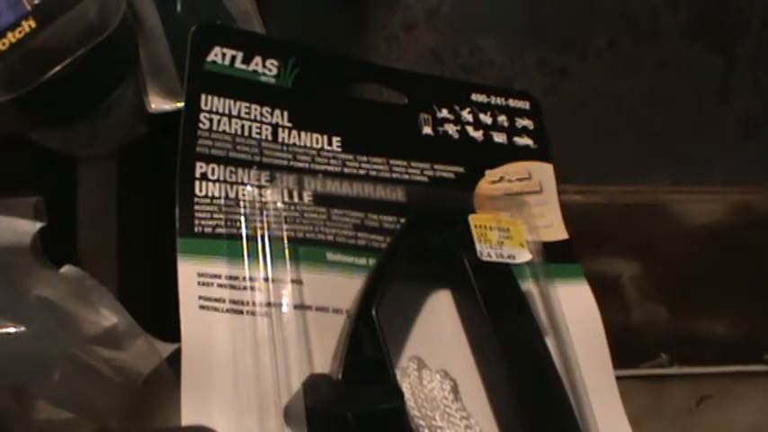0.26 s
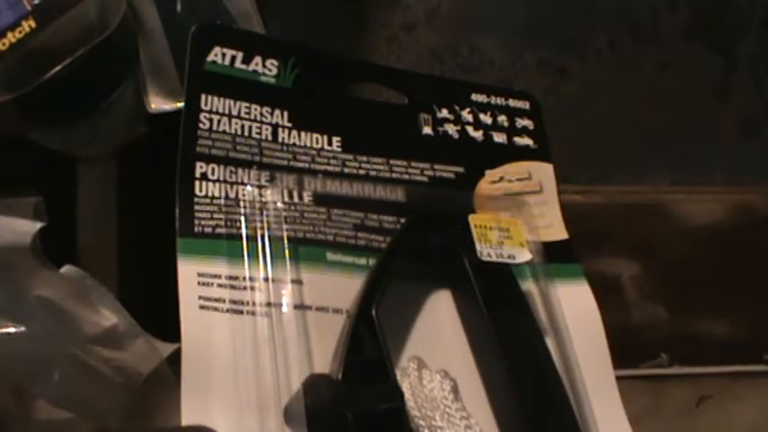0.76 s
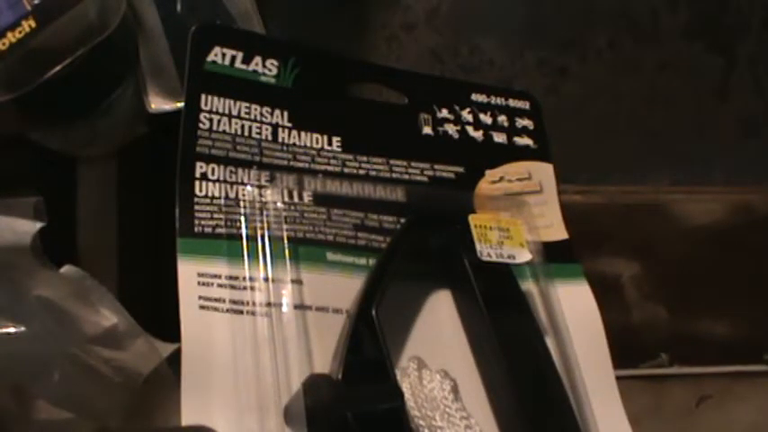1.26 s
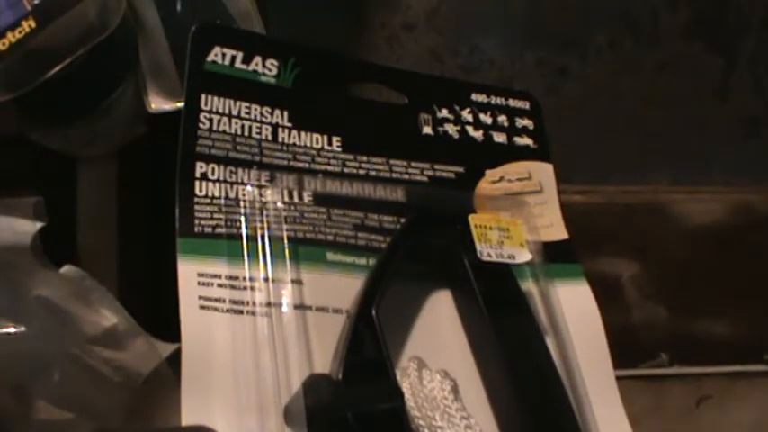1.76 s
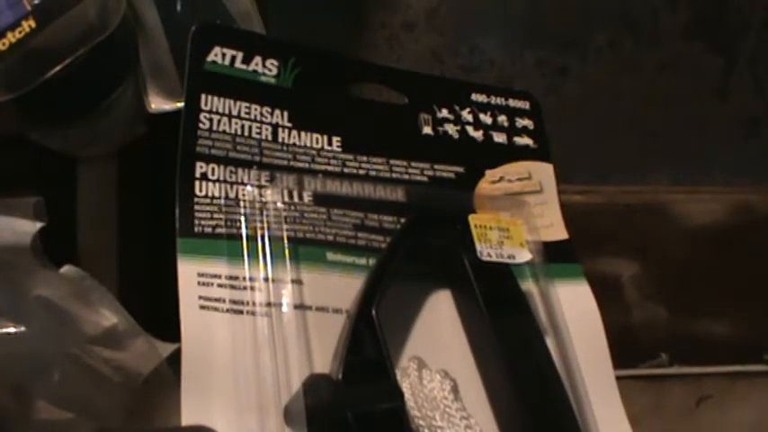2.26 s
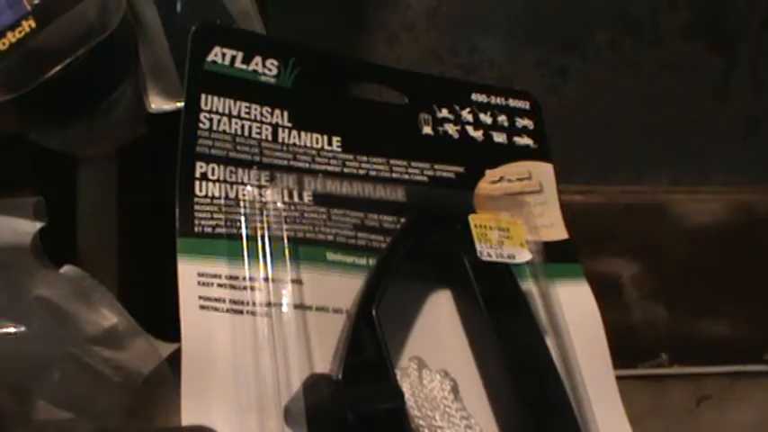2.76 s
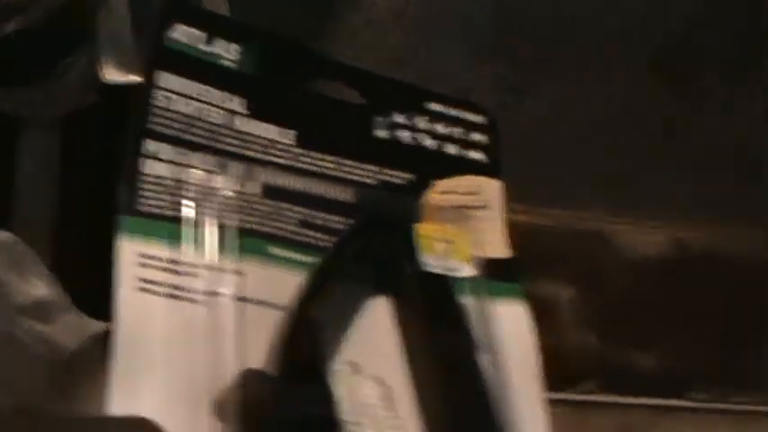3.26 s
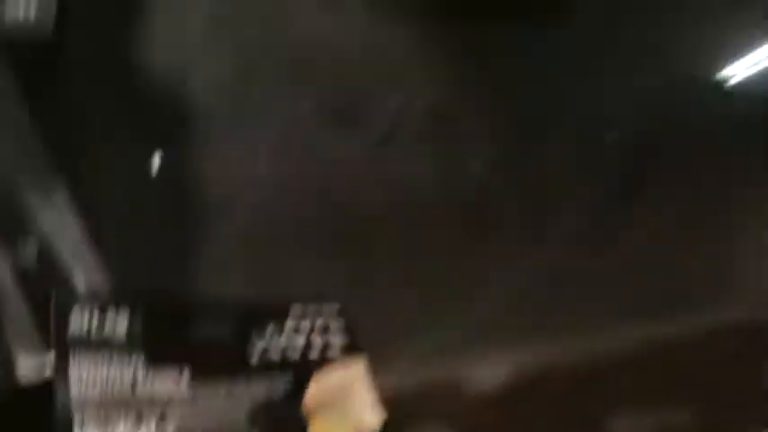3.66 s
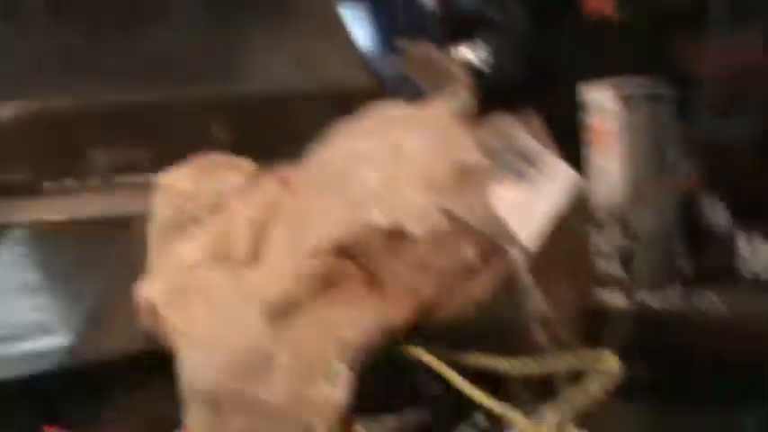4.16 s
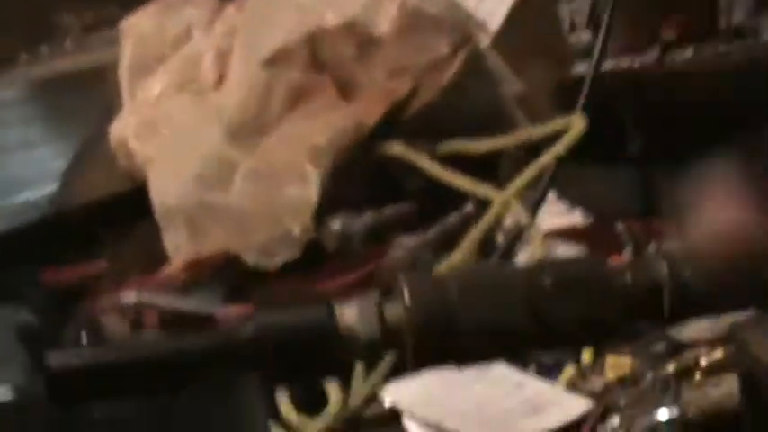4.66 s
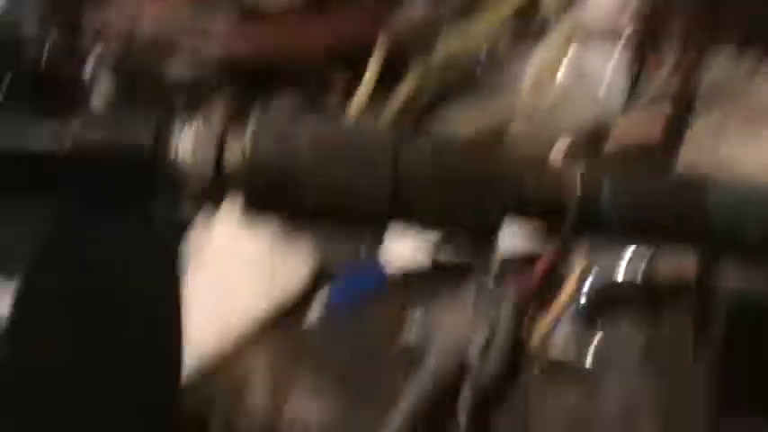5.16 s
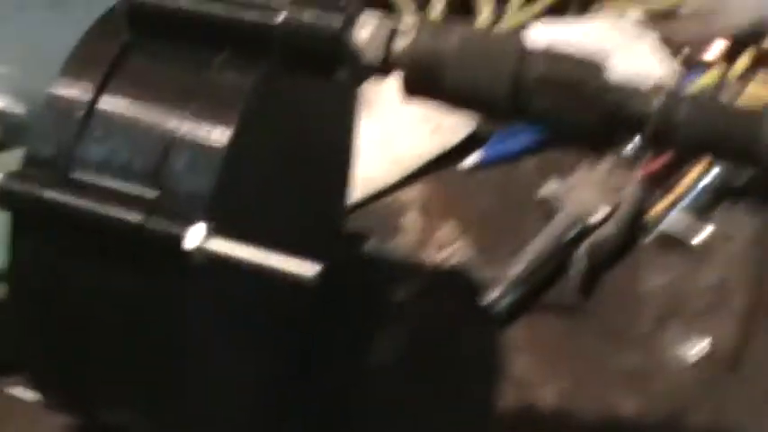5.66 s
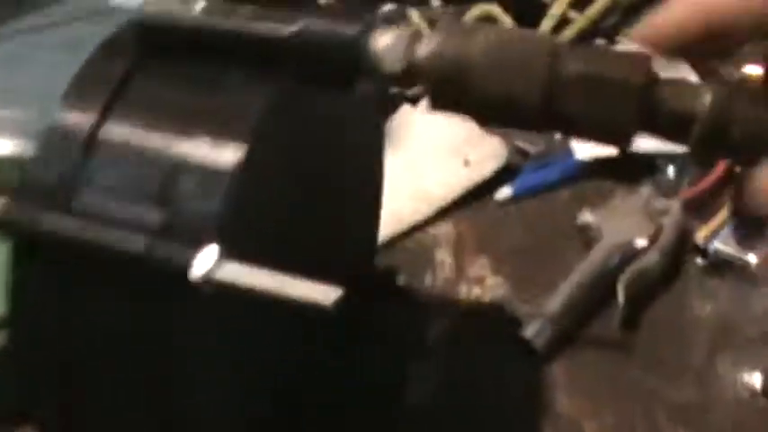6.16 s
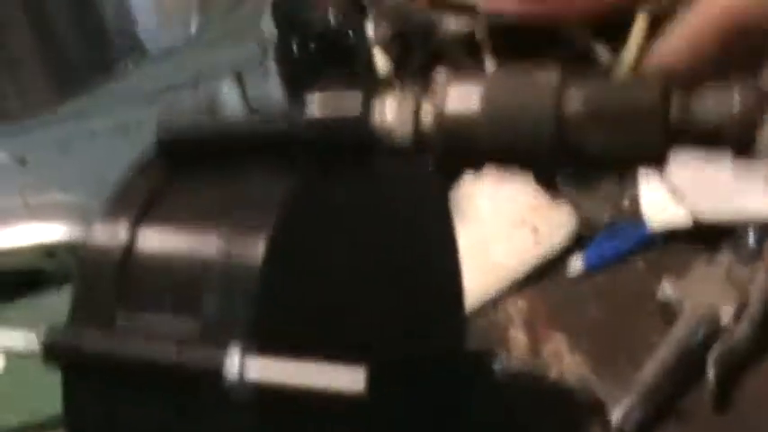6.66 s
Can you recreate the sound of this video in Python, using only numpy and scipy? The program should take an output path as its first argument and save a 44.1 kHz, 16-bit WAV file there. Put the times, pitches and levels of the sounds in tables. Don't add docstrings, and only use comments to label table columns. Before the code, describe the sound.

Close handheld stereo capture at a workbench: a brief fading air puff, a near-silent gap, then a long rushing hiss with small crackling spits. Slow blade throbs blend into a growing low drone as the rotor accelerates. Two firm knocks shake the camera, exhaust gusts rumble on the microphone, and a faint airy whistle joins the bright hiss until the end.

```python
import sys
import numpy as np
from scipy import signal
from scipy.fft import rfft, irfft, next_fast_len
from scipy.io import wavfile
from scipy.ndimage import map_coordinates

SR = 44100
rng = np.random.default_rng(int(sys.argv[2]) if len(sys.argv) > 2 else 0)


def file_out(sig):
    cols = np.atleast_2d(sig).T
    lim = np.clip(cols, -1, 1)
    pcm = np.round(lim * 32767).astype(np.int16)
    wavfile.write(sys.argv[1], SR, pcm)


def makeup_ratio(level_db):
    decades = np.asarray(level_db, float) / 20
    return 10 ** decades


N = 305172

# time [s], blade passes [Hz]
ROTOR = [(.75, 19), (1.1, 26.8), (1.4, 32.8), (1.7, 38), (2, 42.5), (2.6, 50.3), (3.8, 65), (4.1, 67.9),
         (4.4, 69.6), (5, 75.7), (5.3, 79.2), (5.6, 82.2), (5.9, 84.6), (6.18, 86.5), (6.26, 84.6),
         (6.36, 83.7), (6.5, 84.5), (6.92, 87.8)]
# start [s], snap [dB re hiss], cavity [dB re hiss]
SPITS = [(1.264, -12, -1), (1.33, -9, 12.5), (1.774, -2, 8), (1.884, -12.5, -7), (1.928, -8, 0),
         (1.979, 5, 1), (2.679, 4, -5), (2.87, -17, -15), (3.17, -10, 9.5), (3.311, -13, 10.5),
         (3.474, -6, 4), (3.52, -2, 2)]
# start [s], churn, outlet, shoulder and top levels [dB re flow]
PLACES = [
    (0, -17, -1, -3.5, 1.5),
    (.28, -15.5, 5, 1.5, 8),
    (.43, -6, 5.5, -3, 7),
    (.72, -5.5, 2.5, -1, -8.5),
    (3.62, -5, -1, -2.7, -14),
    (4.15, -7.5, 2.5, -2.7, -10),
    (4.75, -10, -0.5, -4.5, -6.5),
    (5.03, -10, 3.6, 2.7, -2.5),
    (5.7, -9.5, 2.5, -0.5, -6.5),
    (6.1, -7, 4, -1.5, -9),
]


def unit(x):
    return x / np.sqrt(np.mean(x ** 2) + 1e-20)


def along(points, hz):
    f, v = np.transpose(points)
    return np.interp(np.log(hz + 1), np.log(f + 1), v)


def curves(rows):
    s, *cols = np.transpose(rows)
    return [np.interp(np.arange(N) / SR, s, c) for c in cols]


def wobble(rate_hz):
    knots = rng.standard_normal(int(N * rate_hz / SR) + 4)
    return map_coordinates(knots, [np.arange(N) * rate_hz / SR])


def filtered(x, response):
    n = x.shape[-1]
    m = next_fast_len(n + 8192)
    return irfft(rfft(x, m) * response(np.fft.rfftfreq(m, 1 / SR)), m)[..., :n]


def pair(mid, side):
    return np.array([mid + side, mid - side])


def steer(x, mid_db, side_db):
    mid, side = pair(*x) / 2
    return pair(makeup_ratio(mid_db) * mid, makeup_ratio(side_db) * side)


def air(lo_hz, hi_hz, slope_db, order=6):
    # frequency [Hz], side re mid [dB]
    width_points = [(400, -15.5), (1290, -11), (2380, -13), (5000, -12.5), (7500, -7.5), (10500, -10),
                    (11800, -12), (14500, -7.5)]

    def response(hz):
        slope = makeup_ratio(slope_db * np.log2(hz / lo_hz + 1e-3))
        edges = np.sqrt((1 + (lo_hz / (hz + 1)) ** order) * (1 + (hz / hi_hz) ** order))
        side_gain = makeup_ratio(along(width_points, np.maximum(hz, 400)))
        return slope / edges * np.array([np.ones_like(hz), side_gain])

    mid, side = filtered(rng.standard_normal((2, N)), response)
    return pair(mid, side) / np.std(mid)


def breathy(rows, width_hz):
    hz, db = curves(rows)
    a, b = filtered(rng.standard_normal((2, 2, N)), lambda f: 1 / (1 + (f / width_hz * 2) ** 2))
    phase = 2 * np.pi * np.cumsum(hz) / SR
    return steer(unit(a * np.cos(phase) + b * np.sin(phase)), db + 2.5, db - 6)


def shop():
    # frequency [Hz], level [dB]
    floor_points = [(18, -51.5), (30, -18), (320, -6), (860, -7), (2430, -13), (3070, -16), (10800, -24),
                    (15500, -34)]
    mid, side = filtered(rng.standard_normal((2, N)), lambda hz: makeup_ratio(along(floor_points, hz)))
    return makeup_ratio(-53) * pair(mid, 0.21 * side) / np.std(mid)


def rotor_phase():
    return 2 * np.pi * np.cumsum(curves(ROTOR)[0]) / SR + 0.027 * wobble(25)


def flow_db():
    # time [s], air flow [dB]
    puff_rows = [(0, -23), (.24, -23.5), (.3, -28.5), (.36, -27), (.41, -30.5), (.43, -34), (.545, -46),
                 (.585, -72), (.7, -97)]
    # time [s], air flow [dB]
    flow_rows = [(0.724, -31.5), (.745, -30.5), (.78, -30.5), (.85, -29.5), (.94, -32.5), (1.5, -30.5),
                 (2.1, -30.5), (2.55, -27), (3.1, -27.5), (3.4, -26), (3.75, -25.5), (4.08, -25.5),
                 (4.95, -23.5), (5.25, -25), (5.78, -25), (6.3, -26), (6.6, -25.5), (6.92, -27)]
    return curves(puff_rows + flow_rows)[0]


def surge():
    return makeup_ratio(0.53 * wobble(4.95) + 0.077 * wobble(12) + 0.5 * wobble(45))


def stay():
    t, move_s = np.arange(N) / SR, .05
    after = [np.clip((t - s) / move_s + .5 + (s == 0), 0, 1) for s, *_ in PLACES]
    return -np.diff(after + [0 * t], axis=0)


def jet_levels():
    # time [s], fizz [dB re flow]
    aim_rows = [(0, 0), (.38, 4.5), (.76, 2.5), (2.2, 1), (2.73, 2.5), (2.86, 10), (3.08, 5.5), (3.12, 2.5),
                (3.2, 2.5), (3.26, 9), (3.52, 3.5), (3.95, 3.5), (4.99, 0), (5.05, -3), (5.65, -1.5),
                (5.75, 0.5), (6.05, 2.5), (6.92, 4.5)]
    t, aim = np.arange(N) / SR, curves(aim_rows)[0]
    churn, outlet, shoulder, top = np.transpose(PLACES)[1:] @ stay()
    opening_s, opening_db, settle_s = 0.753, 23.5, 0.037
    opening = opening_db * np.exp(-np.abs(t - opening_s) / settle_s) * (t > PLACES[1][0])
    outlet = outlet + 0.17 * aim
    shoulder = shoulder + 0.36 * aim + 0.59 * opening
    top = top + 0.34 * aim + opening
    return churn, outlet, aim, shoulder, top


def spits(sizes_db, life_s):
    rise, t = np.zeros(N), np.arange(2000) / SR
    shape = (1 - np.exp(-t / 0.0007)) * np.exp(-t / life_s)
    for (s, *_), db in zip(SPITS, sizes_db):
        rise[round(s * SR):][:len(t)] += makeup_ratio(db + 2.5) * shape
    return rise


def shade():
    # start [s], end [s], shade [dB]
    shade_rows = [
        (5.03, 5.11, -9),
        (5.71, 5.74, -5),
    ]
    t, total_db, uncover_s = np.arange(N) / SR, 0, .15
    for a, b, db in shade_rows:
        times = [a - .006, a + .004, b, b + .03, b - uncover_s * db / 6]
        total_db = total_db + np.interp(t, times, [0, db, db, db / 3, 0])
    return makeup_ratio(total_db)


def seen(x):
    # centre [Hz], width [Hz], boost [dB]
    bench_peaks = [(200, 350, -8.5), (880, 210, 6.5), (1310, 84, 0.5), (1770, 1100, -7.5), (2640, 65, 9),
                   (2940, 80, 6), (3170, 130, -7), (4000, 130, 7), (4190, 120, -13), (5080, 46, 10.5),
                   (5440, 110, 8.5), (10800, 220, -2), (12700, 200, -2)]
    card_peaks = [(365, 100, -9), (472, 160, 3), (996, 17, -13), (1190, 43, -7.5), (1900, 280, 3),
                  (2440, 84, 6), (2880, 160, 3), (3670, 360, -2), (4370, 150, 3.5), (6450, 150, 3),
                  (6870, 1960, -6.5), (9350, 150, 2.5), (10500, 200, 1.5), (11960, 830, -3)]
    casing_peaks = [(1560, 300, 3.25), (2506, 77, 5.5), (3230, 150, 2.6), (4580, 410, 3.7)]
    gap_peaks = [(876, 210, -5), (1035, 47, 9.5)]
    bag_peaks = [(1760, 120, 4), (6260, 200, -2), (10200, 1800, -0.5)]
    hand_peaks = [(2420, 150, -6), (2800, 130, 4.5), (4050, 440, 3.5), (5960, 1700, -3.5), (14200, 1800, 3)]
    vice_peaks = [(2460, 102, -2), (2790, 88, 5.5), (3930, 280, 3), (4300, 250, 2), (8870, 610, -5),
                  (11700, 830, 2.5)]
    open_casing = casing_peaks + gap_peaks
    nearby = [bench_peaks] * 3 + [card_peaks, casing_peaks, open_casing + bag_peaks, open_casing]
    nearby += [open_casing + hand_peaks] + [open_casing + vice_peaks] * 2

    x, out = pair(*x) / 2, np.zeros_like(x)
    for weight, peaks in zip(stay(), nearby):
        on = np.flatnonzero(weight)
        part = slice(max(on[0] - SR // 20, 0), on[-1] + 1)
        delays_s, sizes = rng.uniform(0.000983, .025, 10), 0.09 * rng.standard_normal(10)

        def response(f):
            echoes = 1 + sum(g * np.exp(-2j * np.pi * f * d) for d, g in zip(delays_s, sizes))
            shape = makeup_ratio(sum(db / (1 + ((f - hz) / width * 2) ** 2) for hz, width, db in peaks))
            return shape ** np.array([[1], [0.37]]) * echoes

        out[:, part] += weight[part] * filtered(x[:, part], response)
    return pair(*out)


def hiss(phase):
    # time [s], left - right [dB]
    pan_rows = [(0.0, -2.5), (0.37, -2.5), (1.02, 0), (2.35, -0.5), (2.89, 0), (3.76, -3), (4.09, 1.5),
                (4.72, 2), (5.72, 0.5), (6.92, 1)]
    scatter_db = [-0.5, -1.5, -1.5, 0, 1, -.5, 2.5, -2, -3, -2.5]
    churn, outlet, fizz, shoulder, top = jet_levels()
    _, snap_db, cavity_db = np.transpose(SPITS)
    snap, shaded = 1 + spits(snap_db, 0.004), shade()

    def chop(depth):
        return 1 + depth * np.cos(phase - 1.5)

    def own():
        return makeup_ratio(0.27 * wobble(14) + 0.58 * wobble(90))

    low = makeup_ratio(churn + 0.8) * chop(0.13) * air(236, 1330, 0.95)
    low += makeup_ratio(churn - 9) * chop(0.58) * air(110, 280, .3)
    lumps = makeup_ratio(1.3 * wobble(60)) * chop(0.12) + spits(cavity_db, 0.0033)
    low += makeup_ratio(-3.15) * lumps * air(1374, 2580, 0.53, order=10)

    body = makeup_ratio(-2.5) * air(2190, 4320, -.3, order=10)
    body += makeup_ratio(outlet - 2.5) * air(3480, 5780, -2.5, order=12)

    tip = steer(air(10060, 10060, -.3, order=14), fizz - 0.27, 3 + 0.19 * fizz)
    tip += makeup_ratio(shoulder - 1.47) * shaded ** 0.57 * air(5130, 8600, -4.0, order=14)
    tip += makeup_ratio(top - 1.8) * shaded * snap ** .6 * air(11200, 17000, -17, order=20)
    tip *= makeup_ratio([[.4], [-.4]])

    jet = steer(own() * low + own() * snap * body, 0, scatter_db @ stay())
    jet = makeup_ratio(flow_db()) * (jet + chop(0.04) * own() * snap * tip)
    return seen(surge() * jet) * makeup_ratio(curves(pan_rows)[0] * [[.5], [-.5]])


def pulse_db():
    full_hz, db_per_doubling = 86.3, 14.5
    standing_hz = 10
    speed = (curves(ROTOR)[0] + standing_hz) / (full_hz + standing_hz)
    return -29.5 + db_per_doubling * np.log2(speed)


def gusts():
    # middle [s], half length [s], buffet [dB], flutter [dB]
    gust_rows = [
        (3.1, 0.44, -52, -42),
        (3.857, 0.27, -55, -31.5),
        (4.3, 0.39, -31, -33),
        (4.717, 0.23, -26.5, -51),
        (5.054, 0.21, -31, -48),
        (5.9, .08, -40, -55),
        (6.27, .12, -44, -56),
    ]
    t, edge_db = np.arange(N) / SR, 15
    gain = makeup_ratio(pulse_db() - 23)
    for s, half_s, buffet_db, flutter_db in gust_rows:
        peak_db = np.array([[buffet_db], [flutter_db]], float)
        gain = gain + makeup_ratio(peak_db - edge_db * ((t - s) / half_s) ** 2)
    return gain


def wind():
    # frequency [Hz], level [dB]
    buffet_points = [(12, -30), (25, -13), (50, -3), (110, -12), (200, -11), (400, -17.5), (800, -48),
                     (1500, -120)]
    # frequency [Hz], level [dB]
    flutter_points = [(60, -60), (140, -26), (190, -12.5), (270, -9.5), (350, -26), (600, -29),
                      (1200, -120)]
    buffet_gain, flutter_gain = gusts()
    lumps = makeup_ratio(2.1 * np.array([wobble(12), wobble(12)]))
    noise = filtered(rng.standard_normal((2, N)), lambda hz: makeup_ratio(along(buffet_points, hz)))
    mid, side = filtered(rng.standard_normal((2, N)), lambda hz: makeup_ratio(along(flutter_points, hz)))
    flutter = makeup_ratio(0.92 * wobble(22)) * pair(mid, 0.6 * side)
    return (buffet_gain * unit(lumps * noise) + flutter_gain * unit(flutter)) * makeup_ratio([[-.3], [.3]])


def knocks():
    # start [s], peak [dB], pitch [Hz], right-left share
    knock_rows = [
        (0.403, -33, 110, 0),
        (0.737, -34, 90, 0),
        (1.7, -32, 90, 0.023),
        (1.989, -14.5, 203, 0.11),
        (3.377, -8.5, 115, 0.33),
        (4.801, -25, 120, .8),
    ]
    out, t = np.zeros((2, N + SR)), np.arange(4000) / SR
    for s, db, hz, share in knock_rows:
        thud = np.sin(2 * np.pi * hz * t) * np.exp(-t * hz / 0.45)
        thud += 0.44 * np.sin(2 * np.pi * 4.16 * hz * t) * np.exp(-t / 0.0049)
        thud += 0.58 * np.sin(2 * np.pi * 9.2 * hz * t) * np.exp(-t / 0.0027)
        out[:, round(s * SR):][:, :len(t)] += makeup_ratio(db) * thud * [[1 - 2 * share], [1]]
    return out[:, :N]


def cavity_ring():
    card_place = 3
    flicker = makeup_ratio(2.5 * wobble(16)) + spits(np.transpose(SPITS)[2], .008)
    ring = breathy([(0, 2005, -6)], width_hz=110)
    return stay()[card_place] * makeup_ratio(flow_db()) * flicker * ring


def blades(phase):
    # multiple of passing rate, level [dB], lead [rad]
    thump_rows = [(1, -5, 0.013), (2, 2, 0.022), (3, 1, 0.045), (4, -5, 0.067), (5, -11.5, 1),
                  (6, -39, 0.58)]
    hz, tone = curves(ROTOR)[0], 0
    for k, order_db, lead_rad in thump_rows:
        k = round(k)
        cut = 1 / np.sqrt(1 + (75 / (k * hz)) ** 4)
        port_rad = np.array([[-.12], [.12]]) * (1 + 2.8 / k ** 2)
        level = cut * makeup_ratio(order_db + 0.58 * wobble(7))
        tone = tone + level * np.cos(k * phase + lead_rad + port_rad)
    started = np.arange(N) > .73 * SR
    return np.sqrt(2) * makeup_ratio(pulse_db()) * started * tone * makeup_ratio([[-1.3], [1.3]])


def whistle():
    # time [s], pitch [Hz], level [dB]
    whistle_rows = [(2.65, 4450, -90), (2.85, 4430, -37), (3.5, 4550, -38), (4.22, 4590, -39),
                    (4.36, 4610, -28), (4.62, 4620, -28), (4.78, 4570, -35), (5.07, 4580, -38),
                    (5.17, 4610, -30), (6.1, 4620, -31), (6.25, 4620, -28), (6.92, 4630, -30.5)]
    return makeup_ratio(1.5 * wobble(5)) * breathy(whistle_rows, width_hz=105) * makeup_ratio([[.4], [-.4]])


def hand_hollow():
    # time [s], pitch [Hz], level [dB]
    hollow_rows = [(5.01, 4150, -90), (5.05, 4110, -27), (5.15, 4060, -26), (5.3, 3950, -30),
                   (5.42, 3800, -28), (5.52, 3720, -30), (5.66, 3700, -90)]
    return breathy(hollow_rows, width_hz=200) * makeup_ratio([[.4], [-.4]])


def scene():
    phase = rotor_phase()
    jet = hiss(phase) + cavity_ring() + whistle() + hand_hollow()
    return shop() + jet + wind() + knocks() + blades(phase)


def band_limit(x):
    return signal.sosfilt(signal.butter(12, 16750, fs=SR, output="sos"), x)


def record(dry):
    top_hz, bass_hz = 15860, 40
    mix = filtered(dry, lambda hz: (hz < top_hz) * (1j * hz / (1j * hz + bass_hz)) ** 2)
    return band_limit(mix)


dry = scene()
out = record(dry)
file_out(out)
```